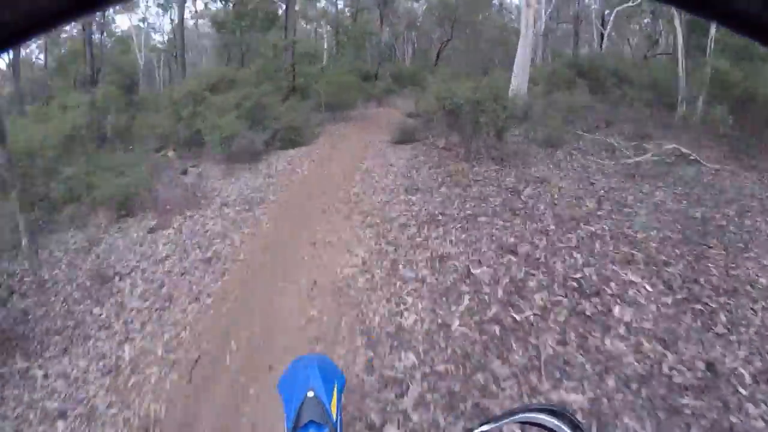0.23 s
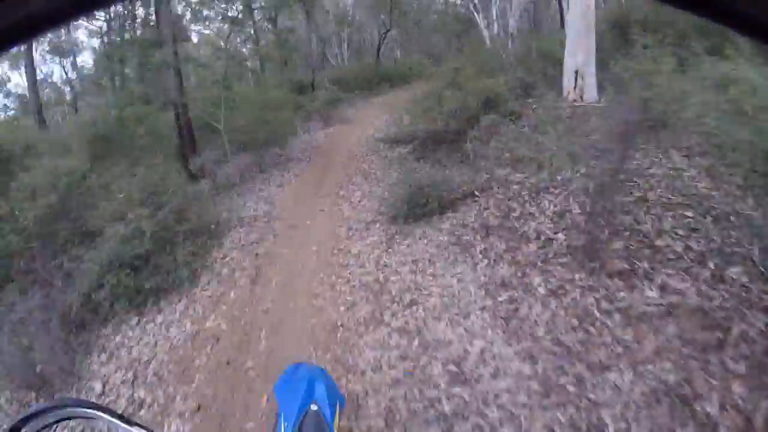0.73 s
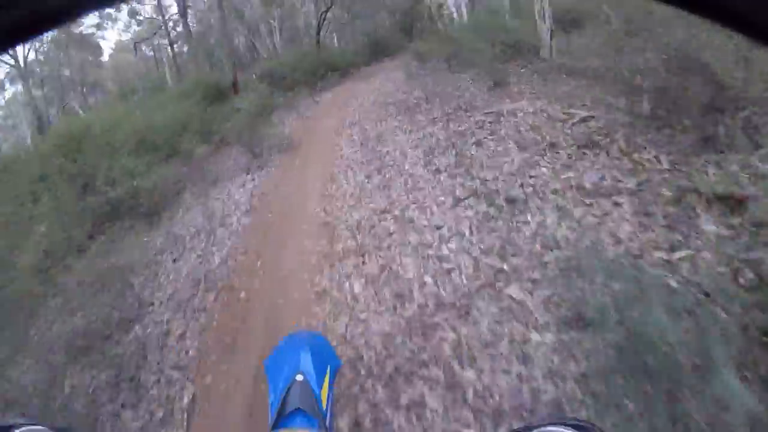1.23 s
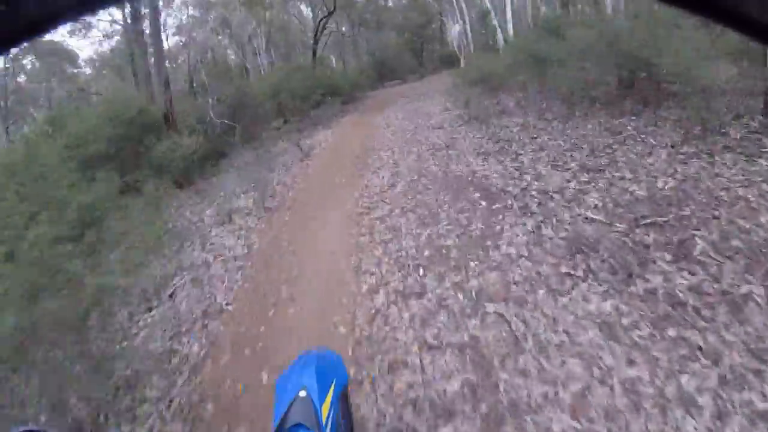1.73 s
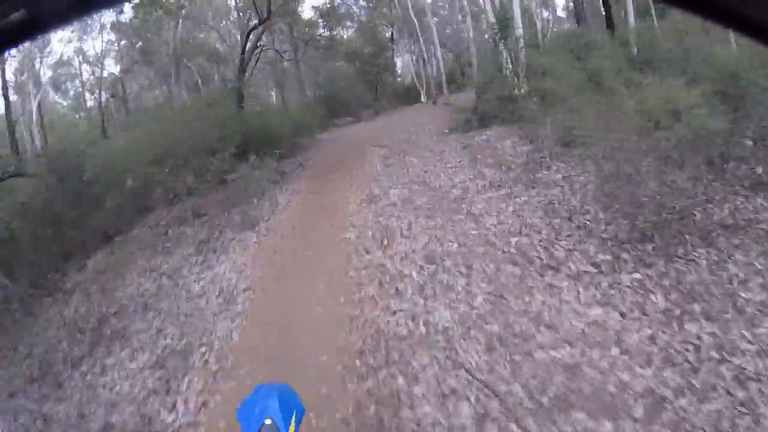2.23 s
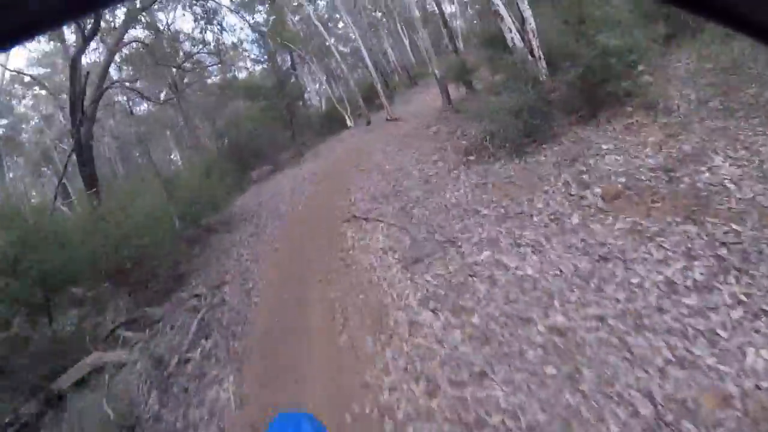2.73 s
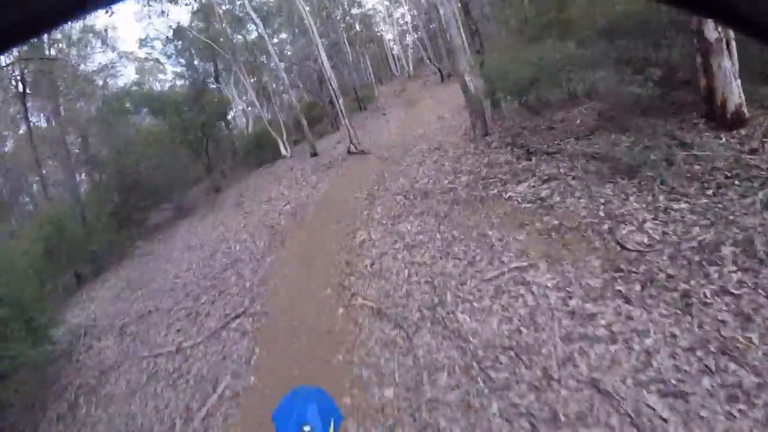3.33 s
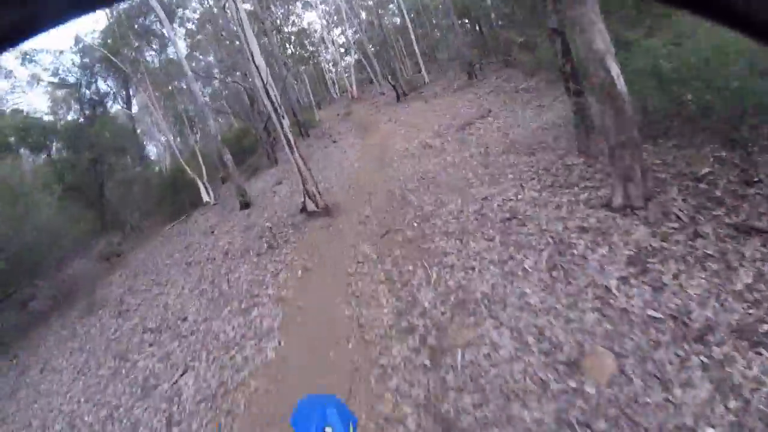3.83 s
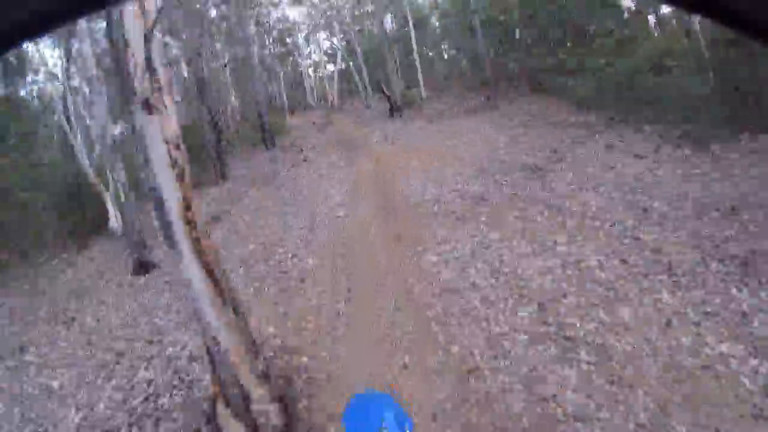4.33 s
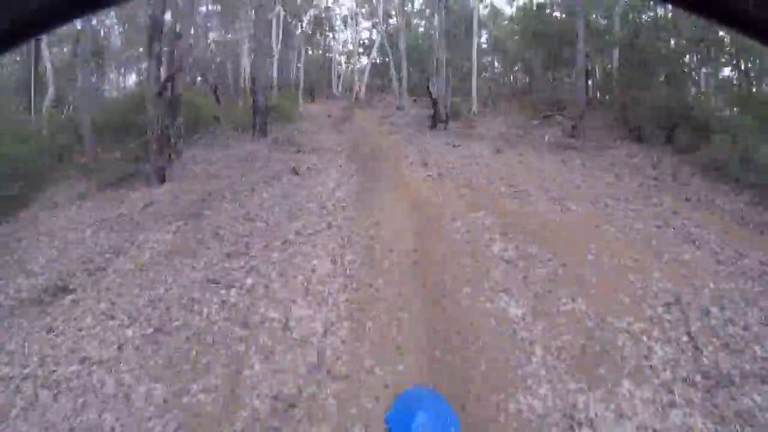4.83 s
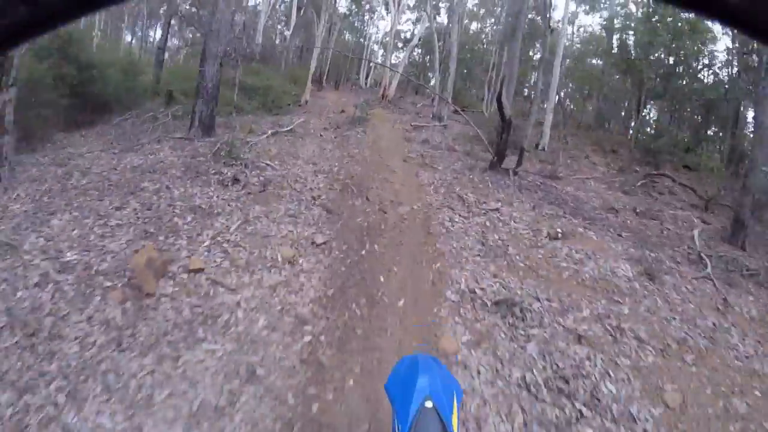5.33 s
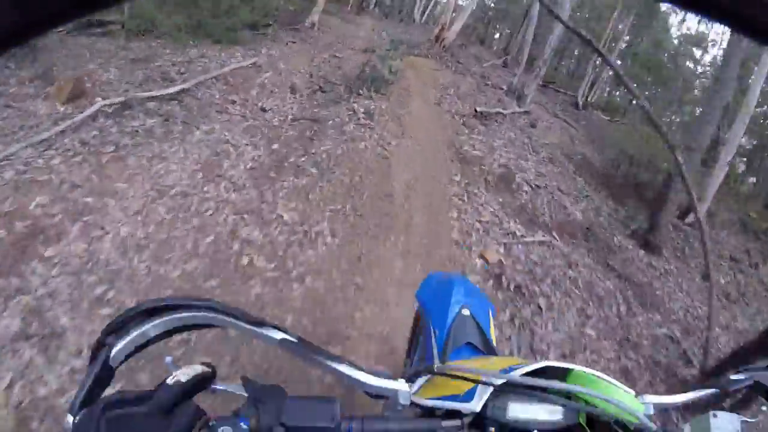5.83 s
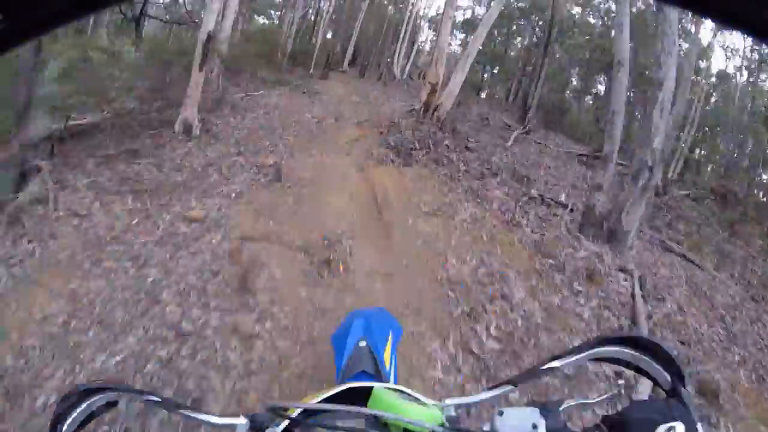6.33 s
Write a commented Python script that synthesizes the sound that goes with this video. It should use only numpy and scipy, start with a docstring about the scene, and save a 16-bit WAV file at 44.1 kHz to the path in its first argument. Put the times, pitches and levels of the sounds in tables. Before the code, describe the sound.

A single-cylinder four-stroke dirt bike runs along a rough bush trail, heard close from the rider's helmet. Valve and chain clatter, tyre rumble through dry leaves and low wind buffeting continue throughout. The engine starts with short, booming throttle pushes and a couple of dull knocks. At 0.8 seconds it opens fully, cracking and howling to its highest revs, and shrubs swish past around 1.2. The revs fall, lift briefly at 2, then sink to a slow, thudding chug. It pulls gently from 3.2 and stumbles near 4. From 4.2 it builds in barking bursts, hardest between 5 and 5.5. After a short drop, a sharp burst at 5.8 brings exhaust bangs, dull knocks and metallic chinks. The throttle eases, twigs flick the helmet at 6.4, and the engine barks again at 6.5.

```python
"""A rough bush trail, heard from the helmet of a rider on a four-stroke single-cylinder dirt bike.
Each firing booms and barks in the exhaust, cracks under load and thuds at low revs; the airbox drones,
and howls at full throttle. Valve gear and chain clatter, heavy firings and jolts knock dully,
shrubs swish past, tyres run through dry leaves and wind buffets the microphone."""
import sys
import numpy as np
from scipy import signal
from scipy.fft import rfft, irfft
from scipy.io import wavfile
from scipy.ndimage import uniform_filter1d

SR = 44100
rng = np.random.default_rng(int(sys.argv[2]) if len(sys.argv) > 2 else 0)


def unload_audio(sound):
    """Save the sound as a 16-bit wav file, at the path given as the first command line argument."""
    columns = np.transpose(np.atleast_2d(sound))
    # keep every value between -1 and 1, then stretch to whole-number steps
    steps = np.round(np.clip(columns, -1, 1) * 32767)
    wavfile.write(sys.argv[1], SR, steps.astype(np.int16))


N = 291060
TIME = np.arange(N) / SR
FFT_SIZE = 2 ** 14
FREQ_HZ = np.maximum(np.arange(FFT_SIZE // 2 + 1) * SR / FFT_SIZE, 1)
REF_FIRING_HZ = 37  # reference for rev-dependent levels and tuning
WRIST_S = 0.0081  # throttle travel time

# throttle twists, shut in between: (start [s], end [s], first opening [0-1], last opening [0-1],
# extra bark [dB], extra crack [dB], extra boom [dB], airbox level [dB], airbox pitch [Hz])
TWISTS = [(0, 0.157, 0.55, 0.49, -2.5, 5.5, 4, -28, 204), (0.167, 0.3, 0.31, 0.3, -6, 8, 2.5, -22, 182),
          (0.299, .6, 0.4, 0.45, 1.5, 5.5, 3.5, -30, 189),
          (0.6, 0.705, 0.32, 0.58, 0.5, 7.5, 4.5, -31, 223),
          (0.683, 0.81, 0.29, 0.41, 5.5, 14.5, 5, -30, 287),
          (0.809, 0.939, 0.87, 1, -1, 0.5, 8, -14, 272.5),
          (0.94, 1.296, 0.97, 0.91, -1, -1.5, -1, -18, 252),
          (1.32, 1.517, 0.13, 0.17, 3.5, 4, -1, -33, 214),
          (1.907, 2.166, 0.6, 0.26, -2.5, 3, -0.5, -28.5, 194),
          (2.202, 2.367, .21, 0.21, 5, 3.5, -4, -33, 158), (2.5, 3.2, 0.28, 0.04, 4.5, 6.5, -8, -40, 132),
          (3.247, 3.371, 0.57, 0.65, -1, -3.5, 3, -30.5, 165),
          (3.376, 3.739, 0.44, 0.29, 1.5, 0, 0, -27, 183),
          (3.759, 3.913, 0.37, 0.33, -5, -7, 0.5, -30, 164),
          (3.985, 4.115, 0.42, 0.35, 0, -3, -0.5, -30, 181),
          (4.11, 4.193, 0.3, 0.3, -0.5, -7, -1, -36, 167), (4.192, 4.268, 0.5, 0.4, 1, -1, 1, -30, 235),
          (4.273, 4.437, 0.88, 0.61, 1, 1.5, 3.5, -36, 246), (4.45, 4.508, 0.46, 0.7, 1, -2, 1.5, -47, 249),
          (4.496, 4.796, 0.64, 0.64, 1, 3, 3.5, -25, 285),
          (4.799, 4.945, 0.48, 0.33, 3.5, 17.5, -2, -39, 242),
          (4.945, 5.024, 0.61, 0.62, 0, 7, 2.5, -19, 260),
          (5.026, 5.104, 0.94, 0.84, -3.5, -0.5, 5, -16.5, 256),
          (5.106, 5.22, 0.9, 0.6, -4, 1.5, 5, -15.5, 282),
          (5.214, 5.525, 0.66, 0.85, -1.5, -1.5, 4.5, -27.5, 330),
          (5.531, 5.6, 0.36, 0.68, -0.5, 1, -0.5, -29, 209),
          (5.632, 5.802, 0.17, 0.12, 6, 7.5, -16, -28.5, 145.4),
          (5.809, 5.958, 0.46, 0.43, 1, 7, -2.5, -28, 319), (5.958, 6.447, 0.13, 0.12, 2, -3, 9, -48, 237),
          (6.509, 6.604, 0.83, 0.96, 1, -0.5, 3, -21.5, 245)]


def exhaust(times, opening, firing_hz, pipe_ref_hz=285, labour_hz=36, labour_db_per_hz=1.03):
    """Firings thud and boom as the gas swings, bark in the pipe, ring the silencer, crack at the outlet."""
    # load response: (opening [0-1], bark [dB], crack [dB], boom [dB], thud [dB], silencer [dB])
    load_levels = [(0, -29.5, -55.5, -22, -24.5, -38.5), (.12, -27.5, -47, -35.5, -25.5, -66),
                   (.26, -22.5, -42, -24, -17, -46.5), (.35, -22, -49, -19, -32.5, -34),
                   (.5, -18.5, -43.5, -21, -24.5, -34.5), (.65, -15.5, -29, -23, -26.5, -34.5),
                   (.82, -15, -27.5, -23, -50.5, -36.5), (.94, -17, -21, -25, -18, -73.5)]
    # resonances: (centre [Hz], width [Hz], level [dB])
    thud_modes = [(84.2, 78, -2), (120.8, 59.7, 2.5)]
    bark_modes = [(173.6, 92, -1), (249, 71, 2.5), (325.4, 98, 6), (565, 140, -8)]
    boom_modes = [(69.8, 39.7, 0)]
    silencer_modes = [(529, 115, 1)]
    # pipe pitch, shifting with gas heat and flow: (time [s], pitch [Hz])
    pipe_pitch = [(.15, 210.6), (.6, 235.5), (.72, 308), (1.7, 273), (2.1, 233), (2.25, 260.5),
                  (3.15, 252.5), (3.3, 288), (3.7, 254), (4.55, 282.7), (4.95, 277), (5.45, 294),
                  (5.65, 259), (6.2, 328), (6.55, 266)]
    # firings that fail to catch: (time [s])
    misfires = [2.18, 3.215, 3.93, 3.965]
    # uneven bangs: (time [s], extra crack [dB])
    bangs = [(0.849, 6), (0.867, 4), (4.766, -0.5), (4.845, 1), (4.947, 1), (5.052, 0.5), (5.100, 5),
             (5.282, 2), (5.374, 3), (5.672, 10), (5.836, 6), (5.913, 9), (6.531, -4)]

    bark_db, crack_db, boom_db, thud_db, silencer_db = curves(load_levels, opening)
    missed = sum(bell(at_s, 0.018) for at_s in misfires)
    thud_db += labour_db_per_hz * np.maximum(labour_hz - firing_hz, 0) - 5 * missed
    bark_db += per_twist(column=4, shut=0) - 18 * missed
    crack_db += per_twist(column=5, shut=0) + sum(db * bell(at_s, 0.0053) for at_s, db in bangs)
    boom_db += per_twist(column=6, shut=0)
    pipe_tuning = curves(pipe_pitch)[0] / pipe_ref_hz

    thud = puffs(times, thud_modes, lag_s=-0.0016, scatter_db=1.9, gas_mix=0.029, gas_s=0.007)
    bark = puffs(times, bark_modes, lag_s=-0.0005, scatter_db=0.8, gas_mix=0.1, gas_s=0.008,
                 tuning=pipe_tuning)
    boom = puffs(times, boom_modes, lag_s=-0.0012, scatter_db=1.5, gas_mix=0.016, gas_s=0.0035)
    silencer = puffs(times, silencer_modes, lag_s=-0.00047, scatter_db=2.5, gas_mix=0.1, gas_s=0.0076)
    body = boom * undb(boom_db) + thud * undb(thud_db) + bark * undb(bark_db)
    return body + silencer * undb(silencer_db) + outlet(times, firing_hz) * undb(crack_db)


def outlet(times, firing_hz, echo_s=0.005044, echo_db=-7.5, slap_db=-4, shock_db=-9, spit_db=-11.5):
    """Each pulse cracks and slaps out behind a steep front, echoes once in the pipe and spits gas."""
    # resonances: (centre [Hz], width [Hz], level [dB])
    crack_modes = [(522, 102, 6), (653, 200, -1), (920, 280, -8), (1032, 100, -1.5), (1203, 71, 3),
                   (1750, 2200, -21)]
    spit_modes = [(1620, 510, 3), (2146, 330, -2)]
    slap_modes, shock_modes = [(400, 560, 0)], [(780, 560, 0)]

    rev_ratio = firing_hz / REF_FIRING_HZ
    # open end reflects inverted; sooner at high revs (hotter gas)
    echoes = times + echo_s / np.interp(times, TIME, rev_ratio) ** 0.11
    pulses = np.r_[times, echoes]
    gains = np.repeat([1, -undb(echo_db)], len(times))
    tuning = rev_ratio ** 0.14 * (1 + 0.015 * drift(rate_hz=4.5))
    crack = puffs(pulses, crack_modes, lag_s=-0.0002, scatter_db=0.8, gas_mix=0.11, gas_s=0.005,
                  tuning=tuning, gains=gains)
    slap = puffs(pulses, slap_modes, lag_s=-0.0003, scatter_db=0.9, gas_mix=0.05, gas_s=0.003,
                 gains=gains)
    shock = puffs(times, shock_modes, scatter_db=1.2, gas_mix=0.08, gas_s=0.002)
    spit = puffs(times, spit_modes, scatter_db=1.5, gas_mix=2, gas_s=0.007)
    return crack + slap * undb(slap_db) + shock * undb(shock_db) + spit * undb(spit_db)


def airbox(times, ref_hz=250, width_hz=45, lead_s=0.00833):
    """Each intake stroke rings the airbox just ahead of the exhaust pulse."""
    level_db, pitch_hz = per_twist(column=7, shut=-60), per_twist(column=8, shut=200)
    howl = puffs(times, [(ref_hz, width_hz, 0)], lag_s=-lead_s, scatter_db=1.7, gas_mix=0.033,
                 gas_s=0.008, tuning=pitch_hz / ref_hz)
    return howl * undb(level_db)


def intake_rasp(times, opening, firing_hz, open_db=-80.5, shut_db=-23.5, db_per_octave=12.5):
    """A very faint, brighter inlet pulse ahead of each firing, growing with revs and throttle."""
    # inlet resonances: (centre [Hz], width [Hz], level [dB])
    inlet_modes = [(425, 60, 1), (715, 130, 3.5), (940, 100, 0), (1110, 110, -0.5), (1290, 80, -5.5)]
    cycle = np.arange(len(times))
    strokes = np.interp(cycle[1:] - 0.37, cycle, times)
    rasp = puffs(strokes, inlet_modes, scatter_db=0.7, gas_mix=0.08, gas_s=0.004)
    return rasp * undb(open_db + shut_db * (1 - opening) + db_per_octave * rev_octaves(firing_hz))


def firing_times(firing_hz, jitter_s=18e-6):
    """One firing per two crank turns, slightly jittered."""
    cycles = np.cumsum(firing_hz) / SR
    times = np.interp(np.arange(int(cycles[-1]) + 1) + 0.045, cycles, TIME)
    return times + jitter_s * rng.standard_normal(len(times))


def throttle():
    """Opening, 0-1: each twist snaps open, ramps to its last position and lets go."""
    opening = np.zeros(N)
    for start_s, end_s, first, last, *_ in TWISTS:
        active = (TIME >= start_s) & (TIME < end_s)
        opening[active] = np.interp(TIME[active], [start_s, end_s], [first, last])
    return smooth(opening, WRIST_S)


def per_twist(column, shut):
    """One column of TWISTS, held through each twist; `shut` in between."""
    held = np.full(N, float(shut))
    for row in TWISTS:
        held[(TIME >= row[0]) & (TIME < row[1])] = row[column]
    return smooth(held, WRIST_S)


def clatter(times, opening, firing_hz, valve_db=-10, loose_db=-5, whirr_db=-3, db_per_octave=4):
    """Valves tap at fixed cycle phases, gears whirr, chain and loose parts tick in each resonance."""
    # clatter resonances, with the microphone housing's ring near 6.4 kHz:
    # (centre [Hz], width [Hz], level [dB])
    clatter_modes = [(998, 625, 9.5), (1880, 790, 4), (2720, 1200, -1.5), (3645, 510, -5.5),
                     (4650, 1750, -4), (5580, 550, -8.5), (6383, 550, 1), (7580, 1240, -30)]
    cycle = np.arange(len(times))
    tap_times = np.concatenate([np.interp(cycle + phase, cycle, times) for phase in (0.02, 0.2, 0.76)])
    taps = clicks(tap_times, undb(3.5 * rng.standard_normal(len(tap_times))))
    valves = undb(valve_db) * unit_rms(decay(taps, 0.0031) * noise())
    gears = undb(whirr_db + 3.6 * drift(rate_hz=25)) * noise()
    ringing = np.zeros(N)
    for mode in clatter_modes:
        loose = undb(loose_db) * ticks(count=1800, spread_db=0.5, decay_s=0.0052)
        ringing += resonate(valves + gears + loose, [mode])
    level_db = -35.5 + db_per_octave * rev_octaves(firing_hz) + 4 * opening
    return unit_rms(ringing) * undb(level_db)


def knocks():
    """Dull knocks of heavy firings and jolts, brief metallic chinks near 2.7 kHz, twigs on the helmet."""
    # bursts: (time [s], level [dB])
    dull_knocks = [(0.367, -20), (0.517, -20), (1.918, -19), (2.715, -23), (5.836, -16), (5.945, -22),
                   (6.018, -26)]
    metallic_chinks = [(2.345, -52), (4.085, -51), (5.833, -31.5), (5.879, -40), (5.945, -34), (5.966, -34),
                       (6.012, -27)]
    twig_flicks = [(6.383, -31.5), (6.395, -31), (6.410, -37)]
    # resonances: (centre [Hz], width [Hz], level [dB])
    knock_modes = [(320, 630, 14), (920, 140, 4.5), (1880, 360, -27)]
    chink_modes = [(1870, 350, -5), (2090, 340, -5), (2660, 110, 2), (4930, 1200, -15), (6450, 960, -8)]
    # twig snap: (frequency [Hz], density [dB])
    snap_spectrum = [(1500, -3), (4200, -3), (7000, -2), (9500, -7), (13000, -12)]
    dull = bursts(dull_knocks, decay_s=0.0095) * unit_rms(resonate(noise(), knock_modes))
    chinks = bursts(metallic_chinks, decay_s=0.015) * unit_rms(resonate(noise(), chink_modes))
    twigs = bursts(twig_flicks, decay_s=0.0052) * unit_rms(equalise(noise(), snap_spectrum))
    return dull + chinks + twigs


def drive_ring(width_hz=380):
    """Chain and sprockets swell into a narrow ring and fade."""
    # rings: (time [s], half length [s], centre [Hz], level [dB])
    rings = [(3.5, 0.3, 1780, -46), (3.896, 0.22, 3140, -54), (4.623, 0.16, 4850, -43.5),
             (4.805, 0.046, 3100, -55)]
    return sum(undb(db) * bell(at_s, half_s) * unit_rms(resonate(noise(), [(hz, width_hz, 0)]))
               for at_s, half_s, hz, db in rings)


def shrubs():
    """Leaves and twigs swish along the bike as dense ticks."""
    # brushes: (time [s], half length [s], level [dB])
    brushes = [(1.157, 0.017, -27), (1.277, 0.075, -26.5), (5.856, 0.02, -34)]
    # leaf swish: (frequency [Hz], density [dB])
    leaf_spectrum = [(500, 3.5), (2000, -4), (5000, -15), (7000, -1), (8000, -15), (9500, -15.5),
                     (11000, -27), (13500, -40)]
    crackle = ticks(count=9000, spread_db=2.5, decay_s=0.001)
    return swells(brushes) * unit_rms(equalise(crackle, leaf_spectrum))


def tyres(firing_hz, level_db=-30, db_per_octave=6):
    """Tyres rumble through leaf litter, louder with the revs."""
    # tyres and rushing air: (frequency [Hz], density [dB])
    rush_spectrum = [(40, -27.5), (100, -7.5), (200, 14), (400, 9.5), (600, 6), (1100, -18), (1500, -9.5),
                     (3000, -25.5), (12000, -80)]
    rush = equalise(noise() * undb(0.5 * drift(rate_hz=22)), rush_spectrum)
    return unit_rms(rush) * undb(level_db + db_per_octave * rev_octaves(firing_hz))


def wind(steady_db=-33):
    """Air buffets the helmet, swelling in gusts."""
    # wind pressure: (frequency [Hz], density [dB])
    buffet_spectrum = [(5, -20), (16, 14.5), (28, 25.5), (45, -9.5), (80, 1.5), (200, -45), (1000, -118.5)]
    # gusts: (time [s], half length [s], level [dB])
    gusts = [(.1, 0.2, -28), (.42, 0.16, -22.5), (0.8, 0.091, -38), (1.355, 0.013, -20),
             (1.604, 0.044, -41), (2.354, 0.16, -28), (3.5, 0.96, -33), (4.897, 0.16, -26),
             (5.96, 0.11, -22), (6.347, 0.081, -18)]
    return hold_rms(equalise(noise(), buffet_spectrum)) * (undb(steady_db) + swells(gusts))


def puffs(times, modes, scatter_db, gas_mix, gas_s, lag_s=0, tuning=1, gains=1):
    """Each pulse rings the modes, pitch scaled by `tuning`, and trails turbulent gas; rms held at 1."""
    impulse = modal_impulse(modes)
    sizes = gains * undb(scatter_db * rng.standard_normal(len(times)))
    speeds = np.interp(times, TIME, tuning * np.ones(N))
    tone = np.zeros(N)
    for start, size, speed in zip(times * SR, sizes, speeds):
        span = np.arange(max(int(start) - 900, 0), min(int(start) + 3600, N))
        position = (span - start) * speed - lag_s * SR
        tone[span] += size * np.interp(position, np.arange(FFT_SIZE), impulse, left=0)
    gas_envelope = decay(clicks(times + lag_s, np.abs(sizes)), gas_s)
    gas = resonate(gas_envelope * noise(), modes)
    return hold_rms(unit_rms(tone) + gas_mix * unit_rms(gas))


def ticks(count, spread_db, decay_s):
    """Noise ticks at random times, a few harder than the rest."""
    when, chance = rng.random((count, 2)).T
    sizes = undb(-spread_db * np.log(chance.clip(0.006)))
    return unit_rms(decay(clicks(when * TIME[-1], sizes), decay_s) * noise())


def bursts(table, decay_s, attack_s=0.001):
    """Envelope of bursts: fast rise, exponential fall."""
    times, db = np.transpose(table)
    return smooth(decay(clicks(times, undb(db)), decay_s), attack_s)


def swells(table):
    """Envelope of Gaussian swells."""
    return sum(undb(db) * bell(at_s, half_s) for at_s, half_s, db in table)


def resonate(x, modes):
    """Filter through resonances."""
    return signal.oaconvolve(x, modal_impulse(modes))[:N]


def equalise(x, spectrum):
    """Filter by a broad spectrum, interpolated in log frequency."""
    hz, db = np.transpose(spectrum)
    gain = undb(np.interp(np.log(FREQ_HZ), np.log(hz), db))
    return signal.oaconvolve(x, minimum_phase(gain))[:N]


def modal_impulse(modes):
    """Impulse response of steep-sided resonances."""
    power = sum((undb(db) / (1 + ((FREQ_HZ / hz - hz / FREQ_HZ) * hz / width_hz) ** 2)) ** 2
                for hz, width_hz, db in modes)
    return minimum_phase(np.sqrt(power) + 1e-6)


def minimum_phase(gain):
    """Causal impulse response with the given gain per frequency."""
    cepstrum = irfft(np.log(gain))
    cepstrum[1:FFT_SIZE // 2] *= 2
    cepstrum[FFT_SIZE // 2 + 1:] = 0
    return irfft(np.exp(rfft(cepstrum)))


def clicks(times, sizes):
    """One-sample impulses."""
    inside = (times >= 0) & (times < TIME[-1])
    return np.bincount((times[inside] * SR).astype(int), sizes[inside], N)


def decay(x, decay_s):
    """Exponential tail on each impulse."""
    return signal.lfilter([1], [1, -np.exp(-1 / (decay_s * SR))], x)


def curves(table, at=TIME):
    """Later columns interpolated against the first."""
    steps, *columns = np.transpose(table)
    return [np.interp(at, steps, column) for column in columns]


def drift(rate_hz):
    """Random values joined by lines."""
    return np.interp(TIME * rate_hz, np.arange(1024), rng.standard_normal(1024))


def hold_rms(x, window_samples=5000):
    """Hold short-term rms at 1."""
    power = uniform_filter1d(uniform_filter1d(x ** 2, window_samples), window_samples)
    return x / np.sqrt(np.maximum(power, 1e-18))


def unit_rms(x):
    return x / np.sqrt(np.mean(x ** 2))


def smooth(x, window_s):
    return uniform_filter1d(x, int(window_s * SR))


def bell(at_s, half_s):
    return np.exp(-((TIME - at_s) / half_s) ** 2)


def rev_octaves(firing_hz):
    return np.log2(firing_hz / REF_FIRING_HZ)


def undb(db):
    return 10 ** (np.asarray(db) / 20)


def noise():
    return rng.standard_normal(N)


def scene():
    """Throttle and revs drive engine and running gear; knocks, shrubs and wind add on. Mono."""
    # engine speed: (time [s], firing rate [Hz])
    revs = [(0.0, 42.71), (0.21, 39.93), (0.35, 45.11), (0.58, 42.63), (0.76, 47.97), (0.9, 59.64),
            (1.25, 64.77), (1.3, 62.48), (1.38, 53.07), (1.45, 43.6), (1.5, 40.96), (1.81, 38.37),
            (2.04, 42.65), (2.27, 32.87), (2.42, 38.06), (2.47, 33.6), (2.63, 34.56), (2.95, 28.21),
            (3.18, 27.79), (3.24, 32.78), (3.73, 32.07), (3.86, 28.47), (3.95, 27.05), (4.12, 27.44),
            (4.36, 33.32), (4.45, 35.55), (4.51, 31.9), (4.72, 37.18), (4.9, 39.15), (5.07, 38.52),
            (5.13, 44.43), (5.35, 44.13), (5.56, 45.55), (5.74, 33.32), (5.8, 38.92), (5.85, 36.46),
            (5.92, 44.03), (6.15, 36.44), (6.25, 37.99), (6.31, 34.58), (6.36, 29.3), (6.6, 42.55)]
    # ground roughness, acting on clatter and tyres: (time [s], gain [dB])
    roughness = [(0, 1.5), (.75, 3), (1.2, 0.5), (1.55, -2), (2.6, 0), (2.95, -3), (3.4, 0.5), (5.2, 1),
                 (5.78, 1), (6.02, 2), (6.45, 0.5)]
    firing_hz, ground_db = curves(revs)[0], curves(roughness)[0]
    times, opening = firing_times(firing_hz), throttle()
    engine = exhaust(times, opening, firing_hz) + airbox(times) + intake_rasp(times, opening, firing_hz)
    running = (clatter(times, opening, firing_hz) + tyres(firing_hz)) * undb(ground_db)
    return (engine + running + knocks() + drive_ring() + shrubs() + wind())[None]


def record(dry, ceiling=0.68, housing_hz=9000, cutoff_hz=13400):
    """Helmet microphone: peaks rounded, treble dulled by the housing, top cut."""
    rounded = ceiling * np.tanh(dry / ceiling)
    dulled = signal.sosfilt(signal.butter(4, housing_hz, fs=SR, output="sos"), rounded)
    return signal.sosfilt(signal.ellip(8, 0.2, 70, cutoff_hz, fs=SR, output="sos"), dulled)


dry = scene()
out = record(dry)
unload_audio(out)
```